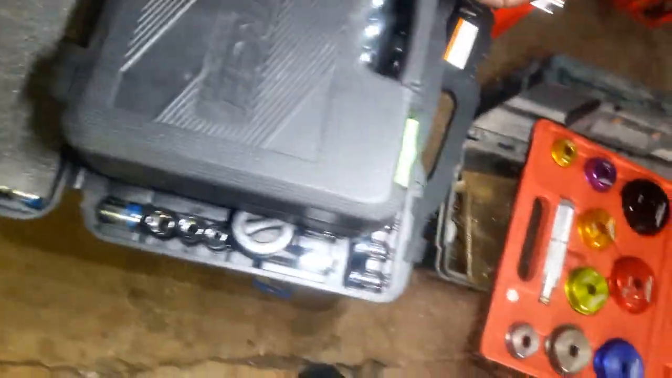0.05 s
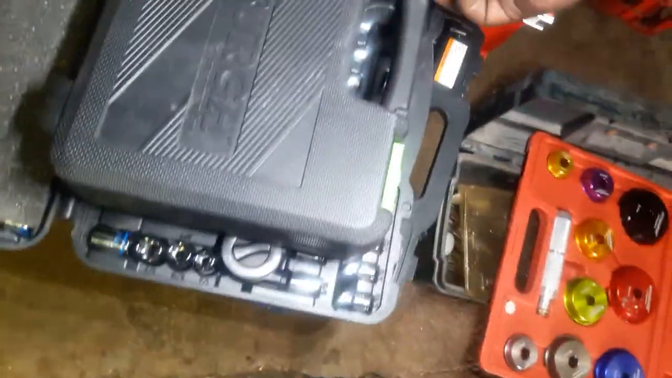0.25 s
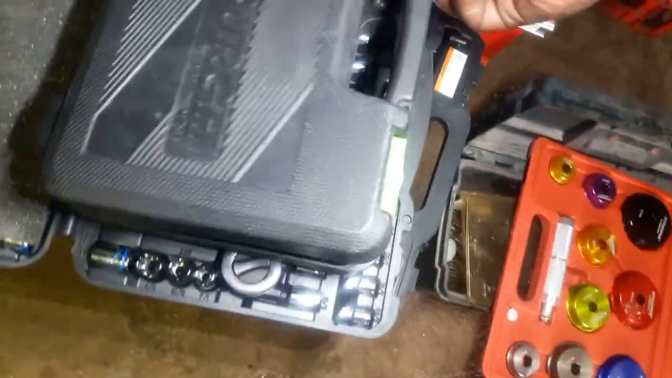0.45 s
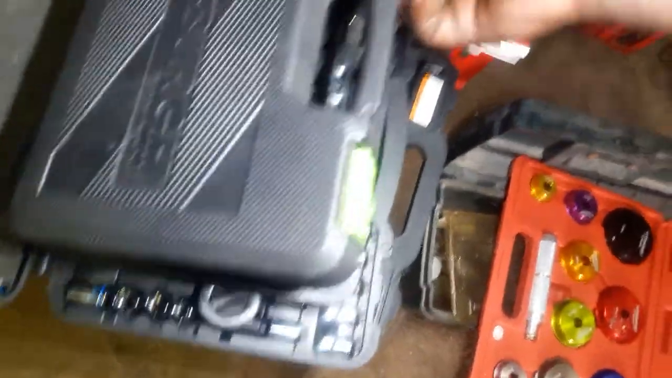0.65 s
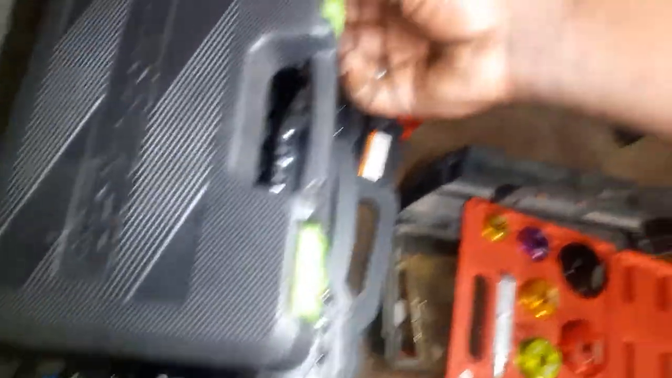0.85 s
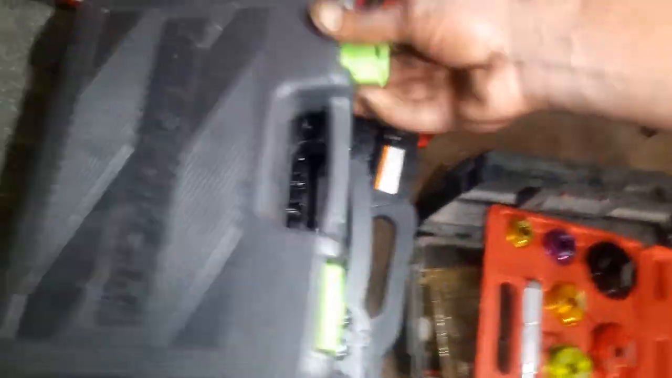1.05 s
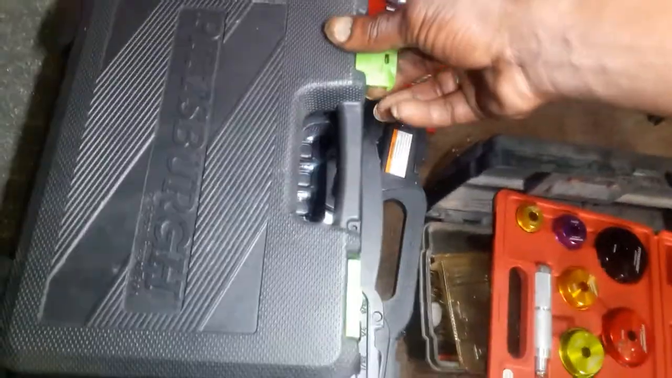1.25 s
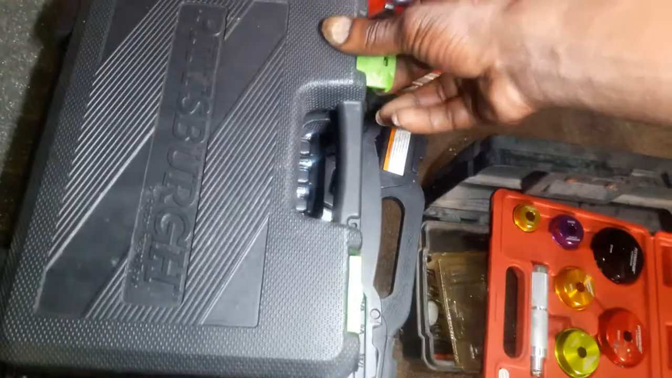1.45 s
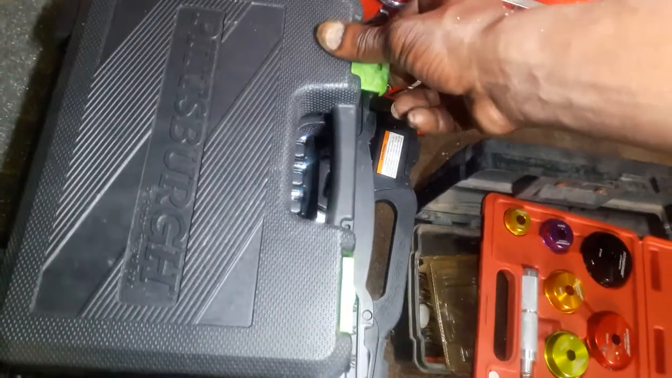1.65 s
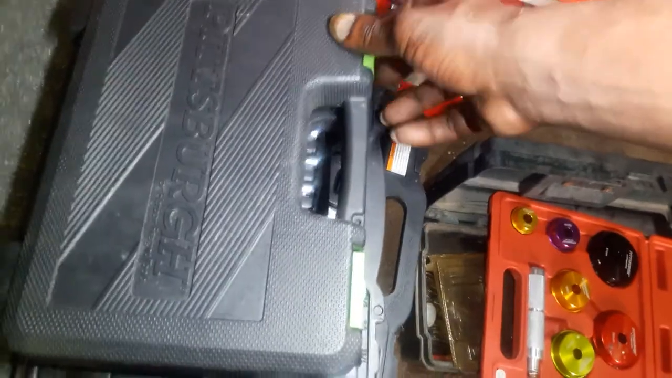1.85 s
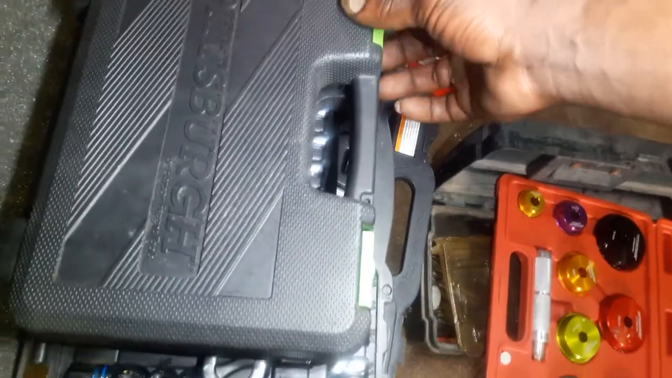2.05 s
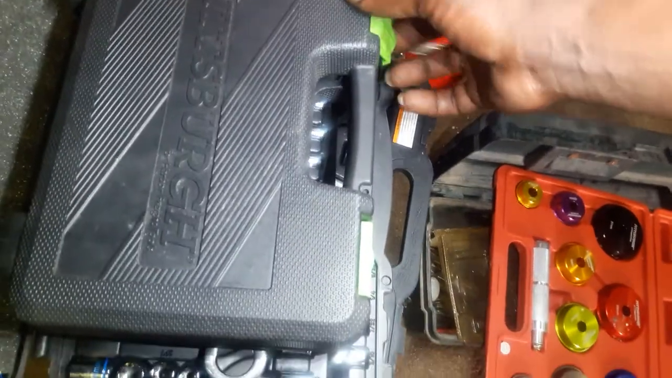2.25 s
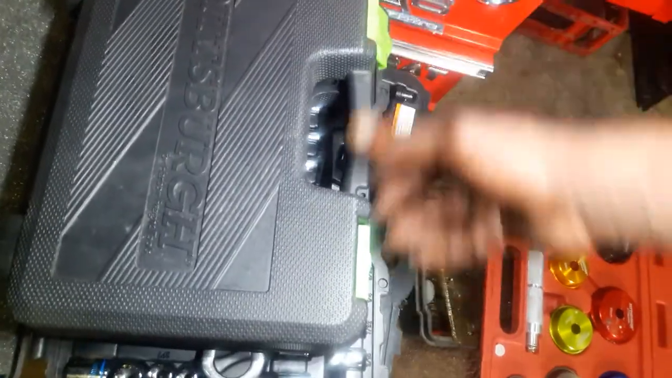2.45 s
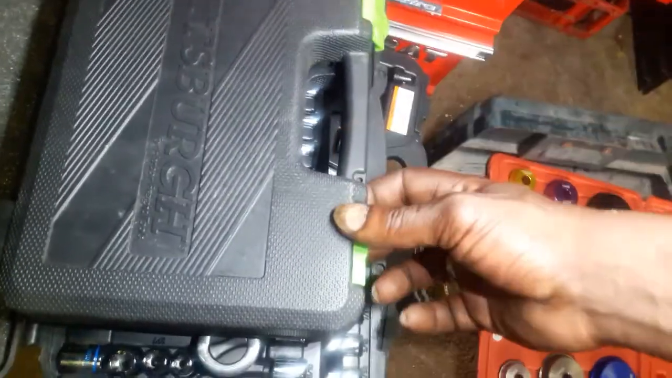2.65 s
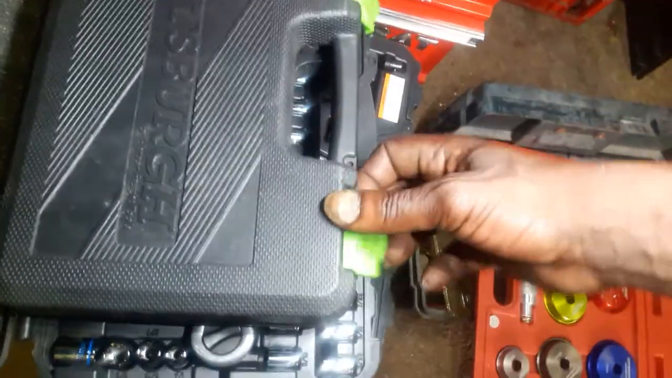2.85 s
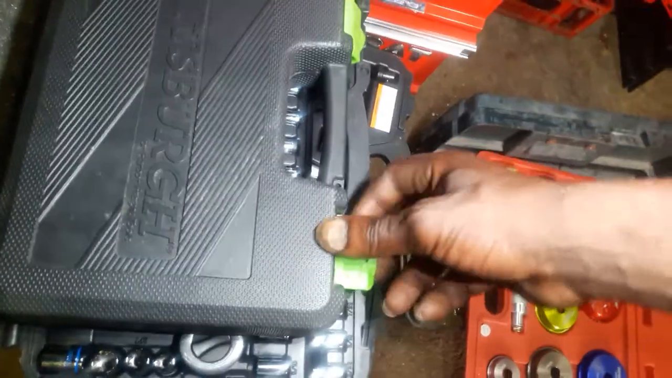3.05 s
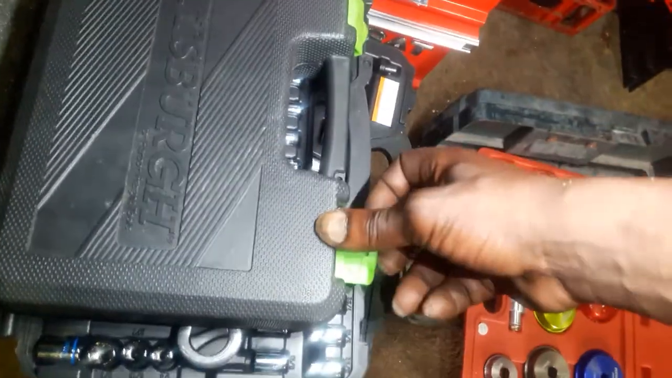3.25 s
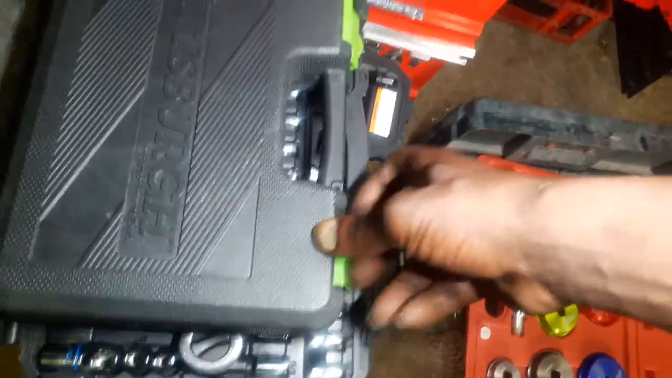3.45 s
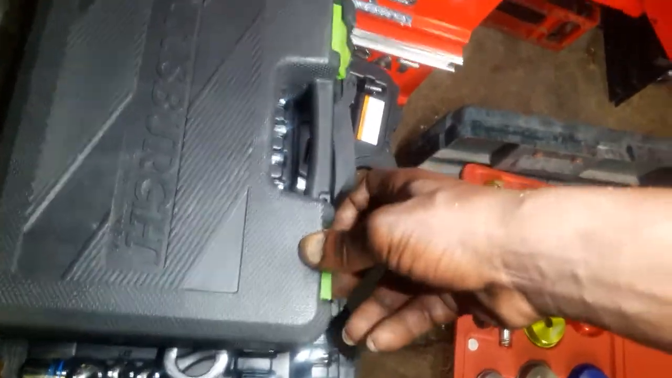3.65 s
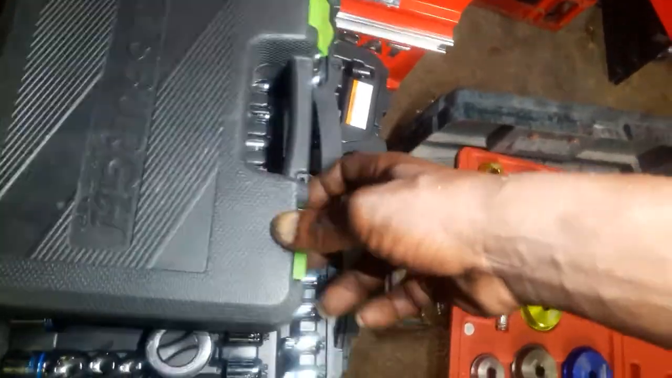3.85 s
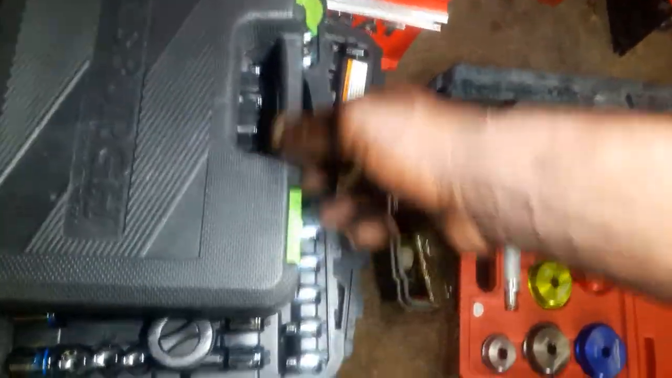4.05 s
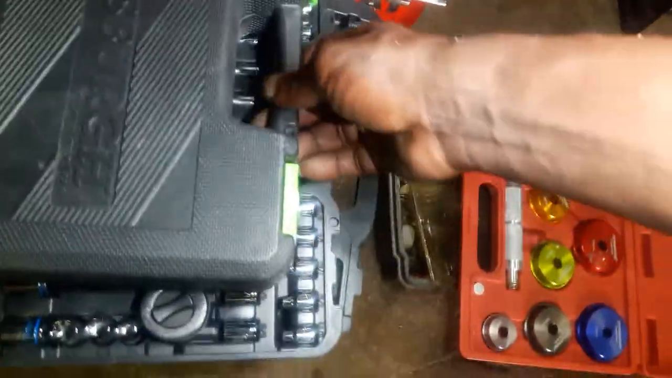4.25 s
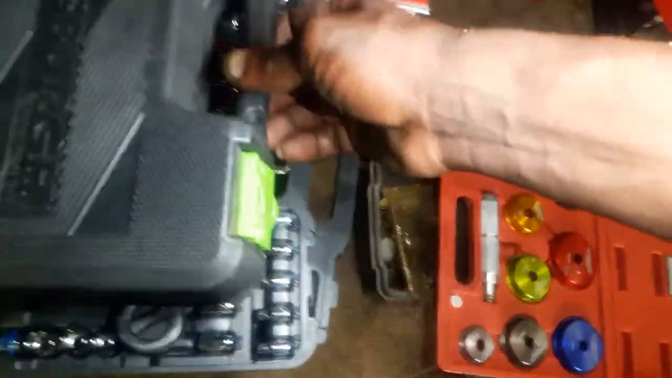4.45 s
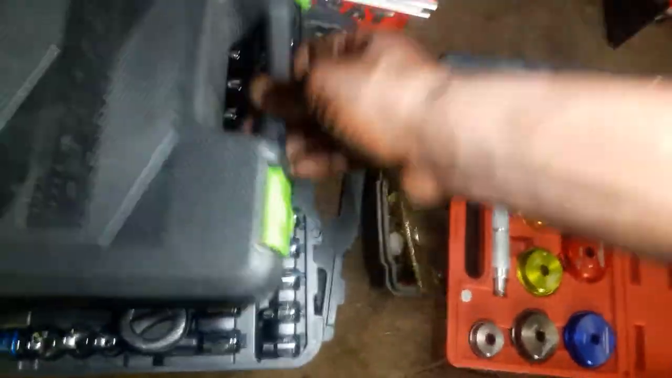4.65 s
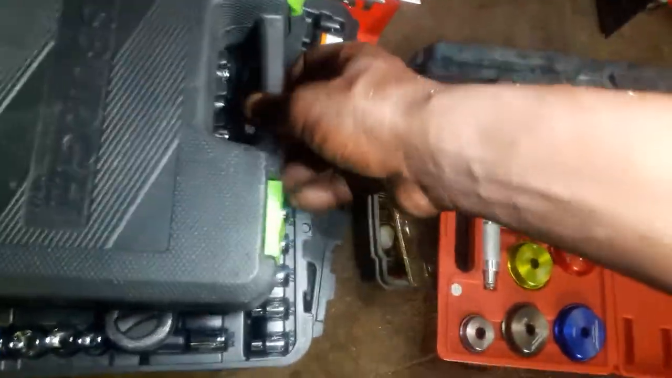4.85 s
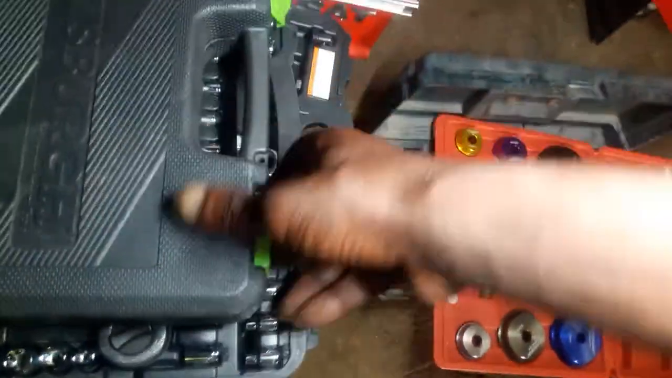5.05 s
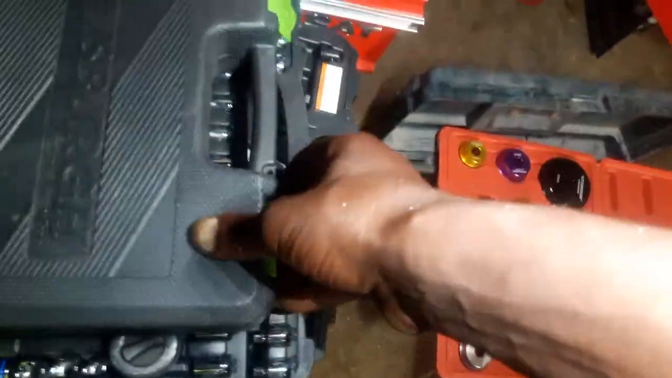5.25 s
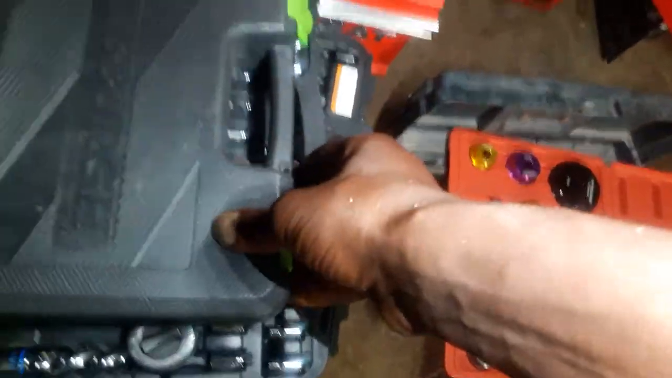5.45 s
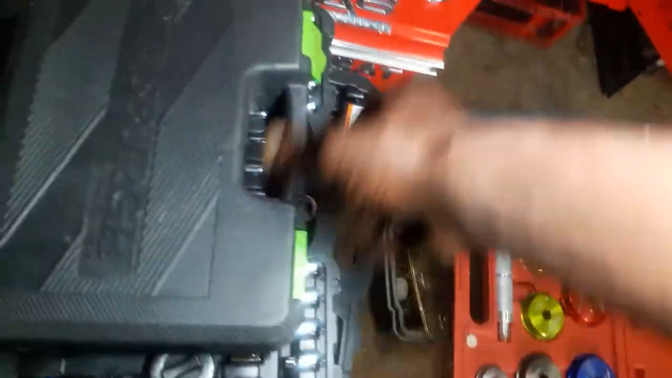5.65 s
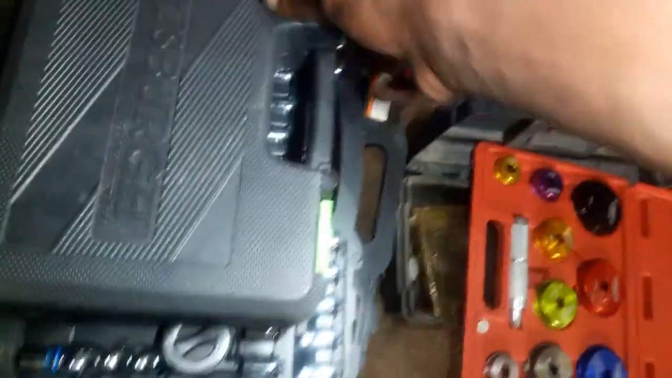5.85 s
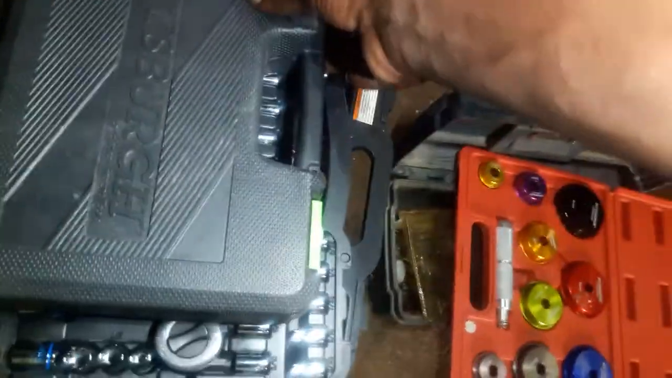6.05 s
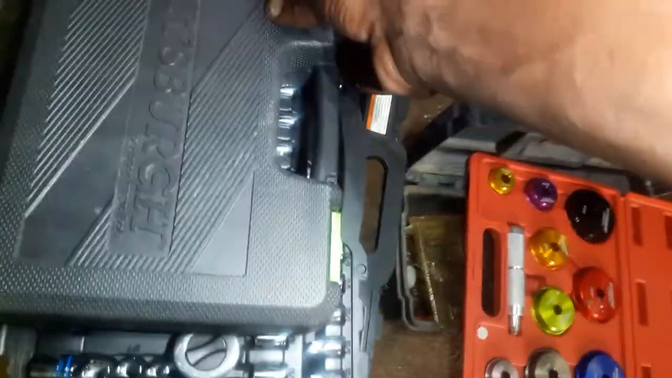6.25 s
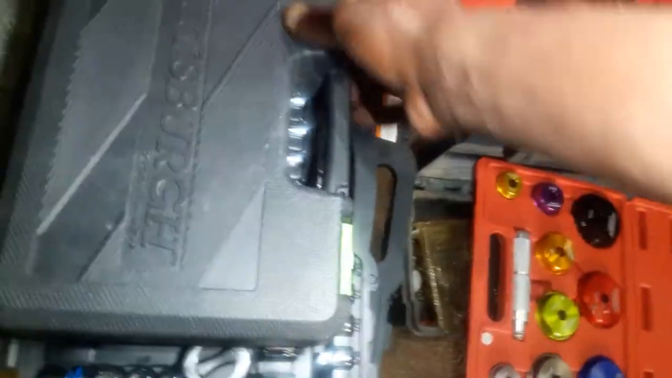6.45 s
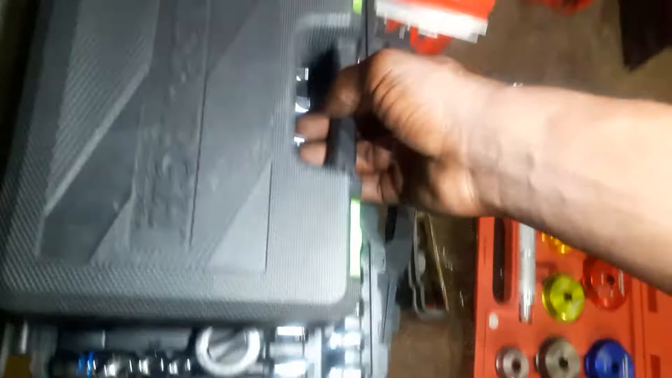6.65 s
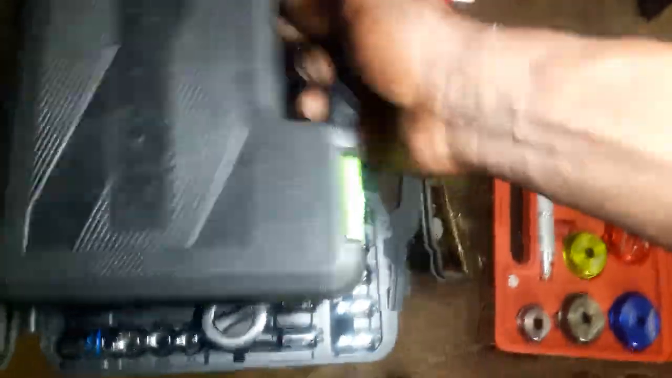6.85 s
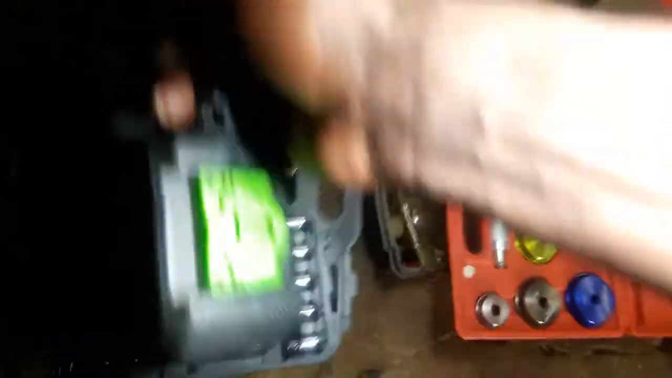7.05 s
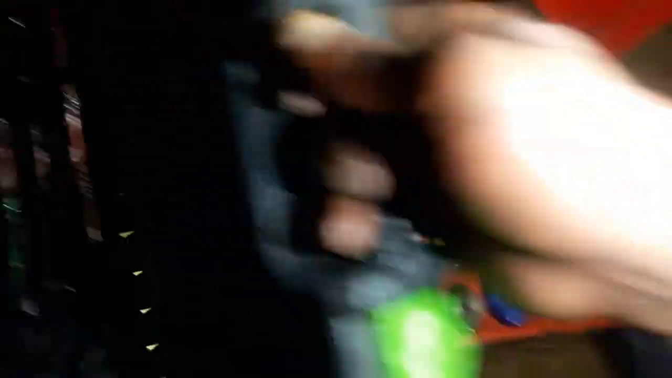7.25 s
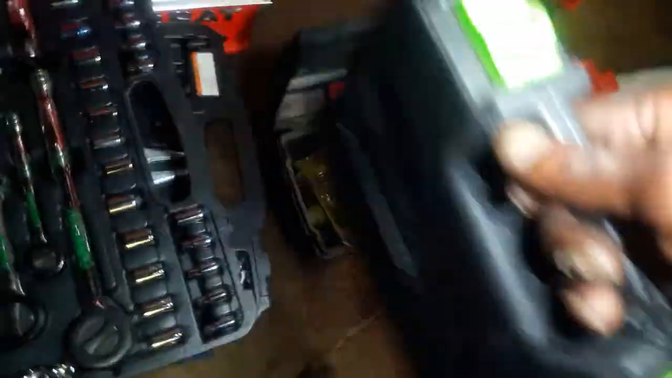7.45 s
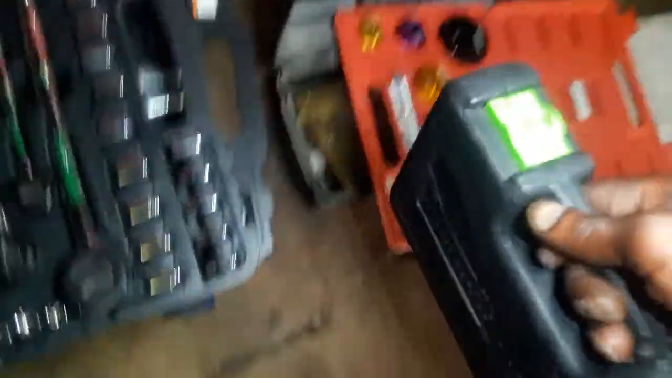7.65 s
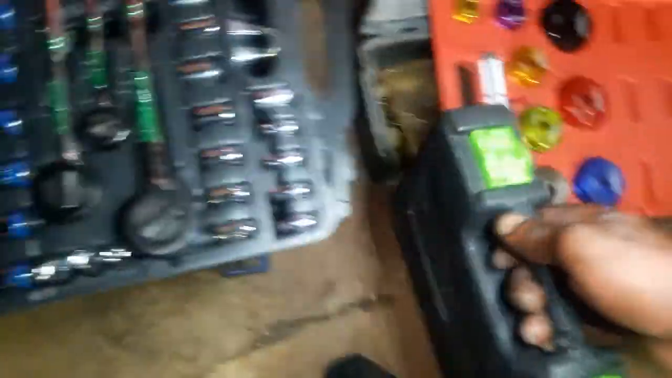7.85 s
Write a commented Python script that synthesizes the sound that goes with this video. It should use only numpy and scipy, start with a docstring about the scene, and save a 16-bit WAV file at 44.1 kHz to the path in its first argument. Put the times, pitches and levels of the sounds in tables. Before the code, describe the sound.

Plastic latches snap shut on a hollow tool case, with irregular knocks, rubs and a clatter as it is lifted indoors.

```python
"""Latching a plastic tool case

A hand closes the latches of a hard plastic case in a workshop, shifts it and lifts it away.
Every knock, snap and rub makes the hollow shell, lid, ribs and latches ring, with a few thin,
high hisses in between. Far traffic rumbles and a bird peeps outside.
The left microphone is shaded from the case, so the two sides sound different."""
import sys
import numpy as np
from scipy import signal
from scipy.io import wavfile
from scipy.ndimage import uniform_filter1d

SR = 44100
rng = np.random.default_rng(int(sys.argv[2]) if len(sys.argv) > 2 else 0)


def unload_wav(signal):
    """Save mono or channel-first audio to the path in sys.argv[1] as 16-bit WAV at rate SR, clipped to [-1, 1]."""
    wavfile.write(
        sys.argv[1],
        SR,
        np.round(np.clip(np.atleast_2d(signal).T, -1, 1) * 32767).astype(np.int16),
    )


N = 348831

# Tone of the workshop's steady hush: pitch_hz, relative_db
AIR_TONE = [(18, -40), (30, -43), (79, -5), (259, -4.5), (632, -14.5), (780, -17.5), (1040, -17.5),
            (5170, -42), (16000, -48)]
# How the traffic swells and fades: time_s, level_db
TRAFFIC_SWELL = [(0.0, -61.5), (2.51, -49.5), (3.74, -62.5), (4.69, -63), (6.78, -80), (6.96, -54.5),
                 (7.91, -70)]
# Blows on the case: start_s, lid_peak_db, shell_above_lid_db, softness_db_per_octave
# Blows on the broad faces ring the shell most. Softer blows lose more of their high notes.
KNOCKS = [(0.002, -28.5, -3.5, 5), (0.049, -24.5, -7, 17), (0.067, -34.5, 6.5, 11), (0.092, -34, 3, 4),
          (0.22, -32, -3.5, 9), (0.275, -24.5, -31, 10.5), (0.295, -36, -12, 8), (0.307, -21.5, -21, 7),
          (0.324, -21.5, -13, 5.5), (0.597, -37, -6, 8.5), (0.782, -59, 0, -4), (0.812, -35.5, 5, 10),
          (0.898, -47.5, 5.5, 7), (0.943, -51.5, 18, 6.5), (1.017, -27, -15, 9.5), (1.103, -13, 3, 3),
          (1.164, -31, 1.5, 5.5), (1.275, -18, -9.5, 7.5), (1.677, -29.5, -3.5, 12.5),
          (1.995, -36.5, -8, 11), (2.015, -28, -7, 6.5), (2.158, -35.5, -10, 10), (2.194, -37, -8, 6),
          (2.549, -24.5, -13, 7.5), (2.583, -27.5, -4, 27), (2.66, -24.5, -3, 10), (2.95, -17, -4.5, 5),
          (3.091, -12.5, -5.5, 10), (3.279, -34, -3.5, 9.5), (3.435, -37, -6, 4.5), (3.524, -20, -18, 3.5),
          (3.538, -19.5, -12.5, 3.5), (3.594, -29, -12, 6.5), (3.741, -33.5, -7, 11),
          (3.786, -37.5, 5.5, 8), (3.833, -34.5, -7, 10.5), (3.908, -14.5, -3.5, 11), (4.049, -33, 2, 6.5),
          (4.244, -43, -5, 4), (4.288, -47.5, 5.5, 0), (4.324, -35.5, -13, 14), (4.348, -37.5, 1, 14),
          (4.404, -29.5, -4, 12), (4.432, -27.5, 0, 18), (4.766, -13, -6.5, 8.5), (4.786, -13.5, 4.5, 5.5),
          (4.862, -11.5, -29, 32), (4.91, -24.5, 4, 6), (4.922, -16.5, -23, 7.5), (5.178, -34.5, 6, 7.5),
          (5.306, -9, -16, 1), (5.599, -41.5, -2, 8), (5.956, -19.5, -12.5, 5.5), (6.022, -48, -3, 2.5),
          (6.142, -18, -5.5, 1.5), (6.36, -53.5, 10, 0), (6.395, -46.5, 5.5, 4), (6.598, -39, -8, 16),
          (6.756, -32, -1.5, 4.5), (6.9, -33, 10, 3.5), (6.95, -32, 4, 18), (6.997, -15, 0, 9),
          (7.023, -9, 3.5, 6), (7.085, -25, 6, 4.5), (7.11, -22.5, -3, 9), (7.142, -24.5, 5, 7),
          (7.183, -24, -21, 9), (7.203, -22.5, -2, 10), (7.238, -31.5, -18, 9), (7.251, -25.5, 0, 6),
          (7.308, -40.5, 9.5, 8), (7.337, -38.5, 3.5, 8), (7.386, -43, 6.5, 8), (7.604, -38.5, 8.5, 2),
          (7.665, -30, -1, 5), (7.725, -48, 9.5, 11)]
# Rubs and rattles on the case; near 6.5 s, soft handling: start_s, length_s, lid_average_db,
# shell_above_lid_db, softness_db_per_octave
RUBS = [(0.028, 0.049, -35, -12.5, 6), (0.198, 0.043, -45.5, 0, 5.5), (0.275, 0.071, -37, -10.5, 12),
        (0.352, .12, -57, -22, 7), (0.6, 0.063, -53.5, 8, 15), (0.733, 0.081, -55, 5.5, 8.5),
        (1.07, 0.058, -37, 1, 9.5), (1.836, 0.069, -59.5, 6.5, 11), (1.997, 0.2, -55.5, -9, 6),
        (2.134, 0.21, -58.5, 1.5, 8.5), (2.54, 0.062, -44, -1, 6.5), (2.832, 0.15, -53, -2, 9),
        (3.28, 0.057, -49.5, 0.5, 8), (3.424, 0.18, -61, 0, 4), (3.519, .025, -40, -9, 5),
        (3.736, 0.34, -56.5, 6.5, 10), (3.901, 0.051, -37, 7.5, 6.5), (4.03, 0.047, -56.5, -10, 0.6),
        (4.129, 0.06, -59.5, 1, 4), (4.29, 0.14, -62, 6.5, 6), (4.4, 0.17, -50, 3, 9.5),
        (4.699, 0.072, -46, 4, 9), (4.759, 0.098, -31.5, -4, 9.5), (4.855, 0.028, -30.5, 9.5, 8.5),
        (4.921, 0.079, -38, 4.5, 9.5), (5.233, 0.048, -53.5, -1.5, 7), (5.632, 0.07, -50, 8.5, 2),
        (5.913, 0.035, -58.5, 13.5, 5.5), (6.49, 0.18, -60.5, 4, 4), (6.655, 0.27, -60.5, -5, 5.5),
        (6.842, 0.28, -38, 3.5, 8), (6.99, .12, -24.5, 4.5, 8), (7.111, .17, -43.5, 7.5, 8),
        (7.293, 0.08, -64, 12, 8), (7.462, .31, -48, -12, 6)]
# The notes each part rings with: pitch_hz, level_db, ring_s (time to fade by 60 dB)
SHELL_NOTES = [(112.6, -16.5, 0.12), (185, -9.5, 0.069), (238.9, -4.5, 0.085), (275.8, 1.5, 0.1),
               (335.8, 4.5, 0.062), (390, 2.5, 0.07), (492, 6, 0.025)]
LID_NOTES = [(538.8, -8.5, 0.083), (622, -2.5, 0.034), (789, 5, 0.013), (937, -1.5, 0.033),
             (1102, 2, 0.017), (1263, -3, 0.029), (1366, -2, 0.016)]
RIB_NOTES = [(1946, -0.91, 0.0027), (2670, -3.4, 0.0032), (3480, -1.5, 0.00093)]
LATCH_NOTES = [(6320, -1.5, 0.0025), (6950, -1, 0.0024), (9550, 1.5, 0.0004), (12900, -7, 0.00091),
               (14860, -10, 0.00086)]
# The bird's calls: start_s, level_db, pitch_hz, length_s
PEEPS = [(0.79, -69, 5460, 0.058), (1.924, -71, 5460, 0.065), (3.01, -69, 5570, 0.056),
         (4.134, -65, 5500, 0.033)]
# Short, thin, high sounds, two hissy slides and one faint tick: start_s, level_db, length_s
THIN_HISSES = [(3.424, -55, 0.054), (6.362, -58.5, 0.02), (6.664, -57.5, 0.076)]
# The high notes in those sounds: pitch_hz, level_db, ring_s
HISS_NOTES = [(7380, 3.5, 0.0071), (8700, -3.5, 0.0052), (10400, -2.5, 0.0029)]
# Tone at the shaded microphone: pitch_hz, left_above_right_db
LEFT_SHADE = [(300, -1.5), (700, 2), (1400, 1), (2800, -2.5), (5600, -8), (10000, -13), (15000, 3)]
# How alike left and right sound: pitch_hz, likeness (0 to 1)
STEREO_LIKENESS = [(100, 1), (700, 0.88), (1400, 0.28), (2800, 0.22), (6000, 0.11)]
# How long the workshop echoes: pitch_hz, ring_s
ROOM_RING = [(150, 0.27), (1000, 0.2), (8000, 0.24)]

CHATTER_S, CHATTER_S_PER_SOFTNESS = 0.017, 0.001  # time to fade by 60 dB; soft blows rattle longer
UNEVEN_DB, UNEVEN_DB_PER_S = 3, 7.0  # spread of slip sizes; long strokes glide more evenly
AIR_DB, AIR_FOLLOWS = -58.5, 0.068  # level of the hush; share of the traffic's swell that it follows


def air_and_traffic():
    """The still workshop hushes while far traffic adds a low, swelling rumble."""
    frames, hz = N // 512 + 5, np.fft.rfftfreq(2048, 1 / SR)
    a, b, c, d = rng.standard_normal((frames, 1025, 4)).T
    likeness = np.clip(1.05 - hz / 900, 0, 1)[:, None]
    left = a + 1j * b
    right = blend(left, c + 1j * d, likeness)
    spectrum = np.array([left, right]) * amp(at_pitch(AIR_TONE, hz))[:, None]
    hush = unit_level(signal.istft(spectrum, nperseg=2048, noverlap=1536)[1][:, :N])
    drone = amp(-((hz - 68) / 1.3) ** 2) + amp(-19 - ((hz - 125) / 9.9) ** 2)  # two narrow low bands
    rumble = unit_level(signal.istft(left * drone[:, None], nperseg=2048, noverlap=1536)[1][:N])
    traffic_db = np.interp(np.arange(N) / SR, *np.transpose(TRAFFIC_SWELL))
    hush_db = AIR_DB + AIR_FOLLOWS * (traffic_db - traffic_db.mean())
    return amp(hush_db) * hush + amp(traffic_db) * rumble


def knocks(parts):
    """Each blow ticks and chatters, ringing the case. The walls get one clean ring of equal energy."""
    near, to_walls = np.zeros((2, N))
    t = np.arange(2048) / SR
    for start_s, lid_db, shell_db, softness in KNOCKS:
        chatter_s = CHATTER_S + CHATTER_S_PER_SOFTNESS * softness
        blow = rng.standard_normal(len(t)) * amp(-60 * t / chatter_s)
        blow[0] = 3.55  # the sharp first tick
        levels_db = part_levels(lid_db, shell_db, softness, ribs_db=5, latch_db=0.5)
        for notes, level_db in zip(parts, levels_db):
            ring = ring_part(blow, notes)
            ring = amp(level_db) * ring / abs(ring).max()
            clean = notes.sum(axis=0)
            add(near, start_s, ring)
            add(to_walls, start_s, clean * np.linalg.norm(ring) / np.linalg.norm(clean))
    return np.array([near, to_walls])


def rubs(parts):
    """Rubbing is many tiny, uneven slips that come in clumps and ring the parts of the case."""
    out, samples = np.zeros(N), SR * 2 // 5
    for start_s, length_s, lid_db, shell_db, softness in RUBS:
        levels_db = part_levels(lid_db, shell_db, softness, ribs_db=4, latch_db=1)
        speed = signal.windows.tukey(round(length_s * SR), 0.7)
        clumps = amp(2 * wobble(samples, smooth=300))
        spread_db = UNEVEN_DB - UNEVEN_DB_PER_S * length_s
        slips = rng.standard_normal(samples) * amp(spread_db * rng.exponential(1, samples))
        slips *= rng.random(samples) < 8000 / SR  # about 8000 slips a second
        force = (slips * clumps)[:len(speed)]
        speed_powers = [0.49, 0.45, 0.41, 1.6]  # the small latch sounds only at speed
        for notes, level_db, power in zip(parts, levels_db, speed_powers):
            ring = ring_part(force * speed ** power, notes)
            add(out, start_s, amp(level_db) * ring / rms(ring[:len(speed)]))
    return out


def bird():
    """A bird gives short, trilled, raspy peeps that sink in pitch."""
    out = np.zeros(N)
    for start_s, level_db, pitch_hz, length_s in PEEPS:
        t = np.arange(0, length_s, 1 / SR)
        trill = 1 + 0.65 * np.cos(2 * np.pi * 55 * t)
        rasp = wobble(SR // 8, smooth=80)[:len(t)]
        sinking_hz = pitch_hz * (1 - 0.085 * t / length_s + 0.032 * rasp)
        tone = np.sin(2 * np.pi * np.cumsum(sinking_hz) / SR)
        add(out, start_s, amp(level_db) * trill * tone * np.hanning(len(t)))
    return out


def thin_hisses():
    """Short bursts of even noise ring three high notes, making two hissy slides and a faint tick."""
    out, notes = np.zeros(N), fading_notes(HISS_NOTES)
    for start_s, level_db, length_s in THIN_HISSES:
        force = rng.standard_normal(SR // 4)[:round(length_s * SR)]
        ring = ring_part(force * signal.windows.tukey(len(force), 0.3), notes)
        add(out, start_s, amp(level_db) * ring / rms(ring[:len(force)]))
    return out


def fading_notes(table):
    """A part rings with one fading sine wave per row; neighbours start in opposite directions."""
    pitch_hz, level_db, ring_s = np.transpose(table)[:, :, None]
    t = np.arange(4096) / SR
    direction = (-1) ** np.arange(len(table))[:, None]
    fade = amp(level_db - 60 * t / np.maximum(ring_s, 0.0005))
    return direction * fade * np.sin(2 * np.pi * pitch_hz * t)


def ring_part(force, notes):
    """A force rings a part. Where it lands sets each note's strength, picked here by chance."""
    strengths = amp(2 * rng.standard_normal(len(notes)))
    return signal.fftconvolve(force, strengths @ notes)


def part_levels(lid_db, shell_db, softness, ribs_db, latch_db):
    """Levels of shell, lid, ribs and latch: a soft touch barely reaches the small, high parts."""
    rib_octaves, latch_octaves = 1.6, 3.1  # above the lid
    return lid_db + np.array([shell_db, 0, ribs_db - softness * rib_octaves,
                              latch_db - softness * latch_octaves])


def microphones(sound):
    """The left side hears a duller, slightly late copy, mixed with sound scattered round the hand."""
    hz, t, spectrum = signal.stft(sound, SR, nperseg=128, noverlap=96)
    a, b = uniform_filter1d(rng.standard_normal((2, len(t), len(hz))), size=16, axis=1)
    scatter = np.exp(1j * np.angle(a + 1j * b)).T
    delay = np.exp(-2j * np.pi * hz[:, None] * 0.0001)
    path = blend(delay, scatter, at_pitch(STEREO_LIKENESS, hz)[:, None])
    shade = amp(at_pitch(LEFT_SHADE, hz))[:, None]
    left = signal.istft(spectrum * path * shade, nperseg=128, noverlap=96)[1][:N]
    return np.array([left, sound])


def echo_tail():
    """The walls send back many small echoes, and each pitch dies away at its own speed."""
    taps = np.zeros((2, SR // 2))
    slots = np.arange(140, SR // 2 - 20, 20)
    arrivals = slots + rng.integers(0, 20, (2, len(slots)))
    np.put_along_axis(taps, arrivals, rng.choice([-1., 1.], arrivals.shape), 1)
    hz, t, (left, right) = signal.stft(taps, SR, nperseg=256)
    left = blend(right, left, at_pitch(STEREO_LIKENESS, hz)[:, None])  # low notes reach both sides alike
    fade = amp(-60 * t / at_pitch(ROOM_RING, hz)[:, None])
    echoes = signal.istft(np.array([left, right]) * fade, SR, nperseg=256)[1]
    return echoes / np.linalg.norm(echoes[0])


def room(sound):
    """Three echo tails take quick turns, so the room's echo sounds smooth and even."""
    turn = 2 * np.pi * 70 * np.arange(N) / SR
    shares = [np.sqrt((1 + np.cos(turn + 2 * np.pi * k / 3)) / 3) for k in range(3)]
    return sum(signal.oaconvolve(sound * share, echo_tail(), axes=1)[:, :N] for share in shares)


def amp(db):
    return 10 ** (np.asarray(db) / 20)


def rms(sound):
    return np.sqrt(np.mean(sound ** 2) + 1e-20)


def unit_level(sound):
    return sound / rms(sound)


def wobble(samples, smooth):
    return unit_level(uniform_filter1d(rng.standard_normal(samples), smooth))


def blend(shared, separate, likeness):
    return likeness * shared + np.sqrt(1 - likeness ** 2) * separate


def at_pitch(table, hz):
    pitches_hz, values = np.transpose(table)
    return np.interp(np.log(hz + 1), np.log(pitches_hz + 1), values)


def add(mix, start_s, sound):
    stretch = mix[round(start_s * SR):][:len(sound)]
    stretch += sound[:len(stretch)]


def scene():
    """The nearby case and the far bird echo in the workshop, over the hush and the traffic."""
    tables = (SHELL_NOTES, LID_NOTES, RIB_NOTES, LATCH_NOTES)
    parts = [(-1) ** k * fading_notes(table) for k, table in enumerate(tables)]
    case = knocks(parts) + rubs(parts) + thin_hisses()
    bass_cut = signal.butter(2, 100, "high", fs=SR, output="sos")  # the case is too small for deep bass
    near, to_walls = signal.sosfilt(bass_cut, case)
    peeps = np.array([bird()] * 2)
    case_in_room = microphones(near) + amp(-8.5) * room(microphones(to_walls))
    return case_in_room + amp(-9) * peeps + room(peeps) + air_and_traffic()


def record(dry):
    """The small microphones lose the deep bass, and the very highest treble is cut off."""
    thin = signal.sosfilt(signal.butter(2, 60, "high", fs=SR, output="sos"), dry)
    treble_cut = signal.firwin(511, 16300, window=("kaiser", 9), fs=SR)
    return signal.oaconvolve(thin, treble_cut[None], "same")


dry = scene()
out = record(dry)
unload_wav(out)
```